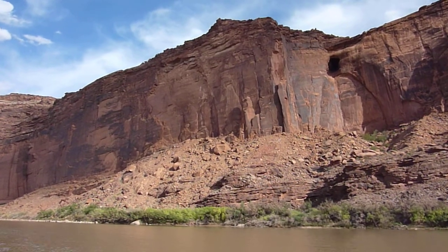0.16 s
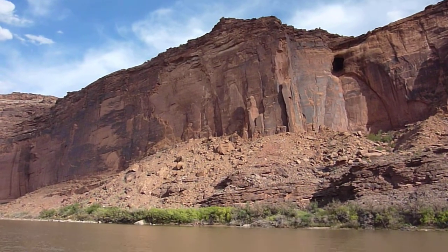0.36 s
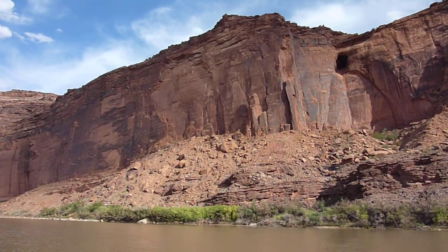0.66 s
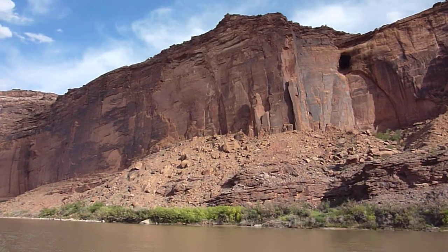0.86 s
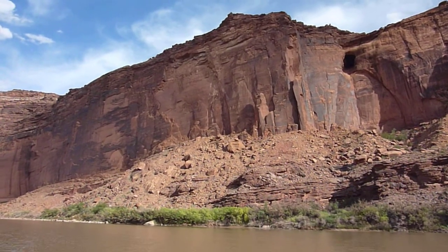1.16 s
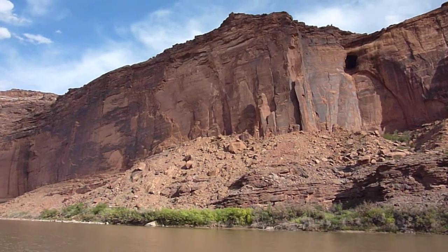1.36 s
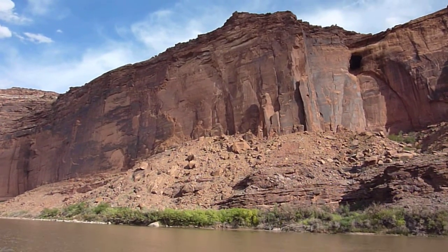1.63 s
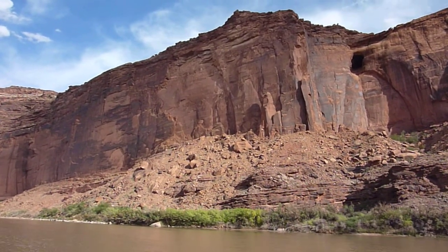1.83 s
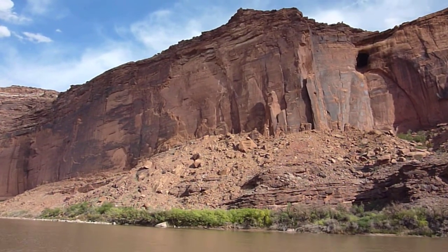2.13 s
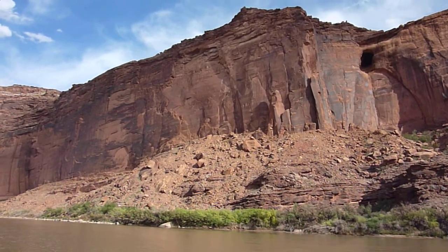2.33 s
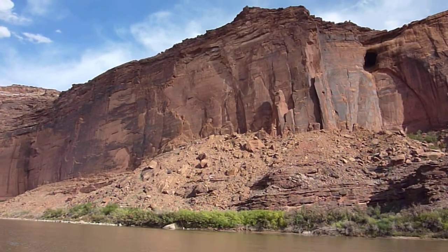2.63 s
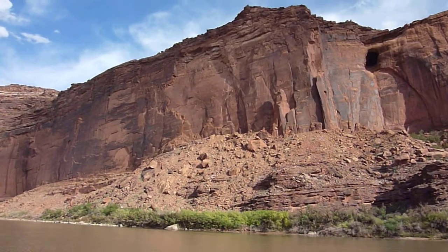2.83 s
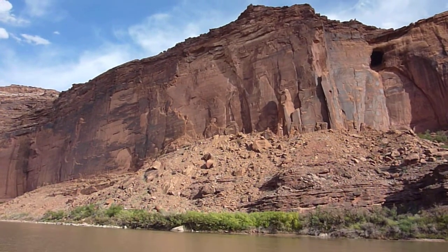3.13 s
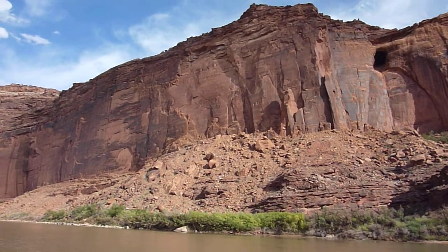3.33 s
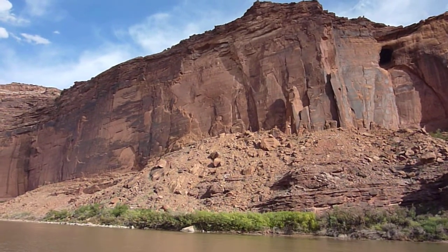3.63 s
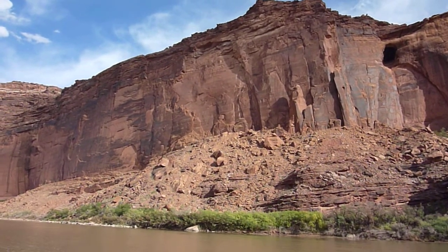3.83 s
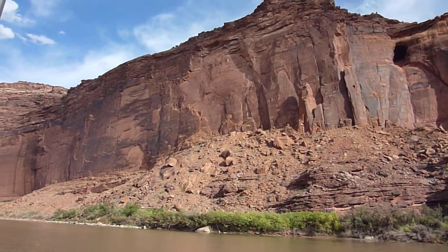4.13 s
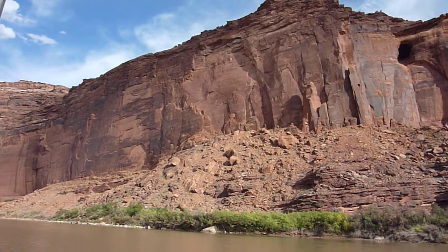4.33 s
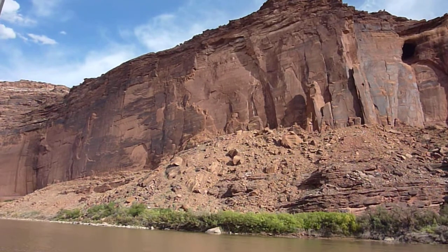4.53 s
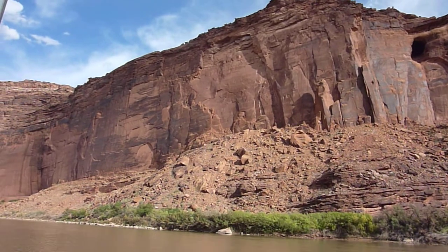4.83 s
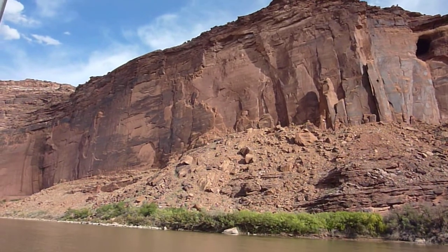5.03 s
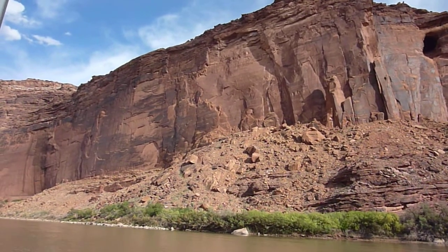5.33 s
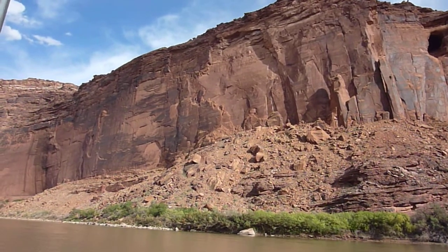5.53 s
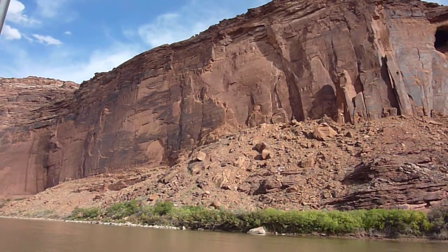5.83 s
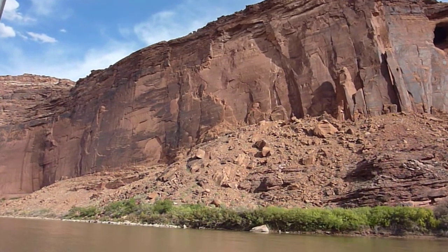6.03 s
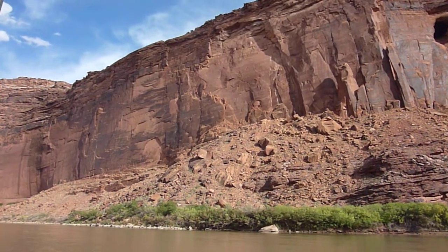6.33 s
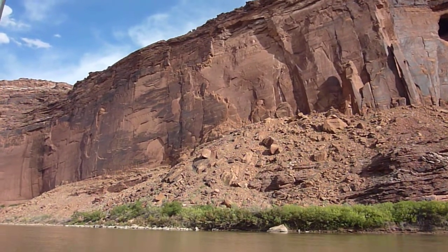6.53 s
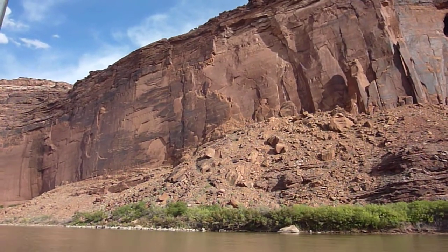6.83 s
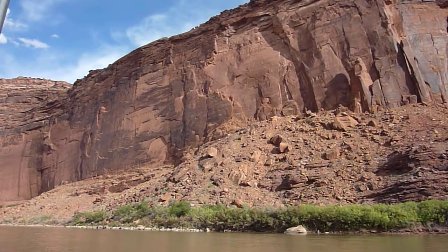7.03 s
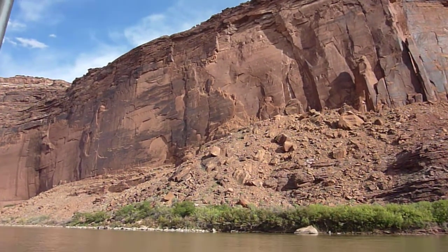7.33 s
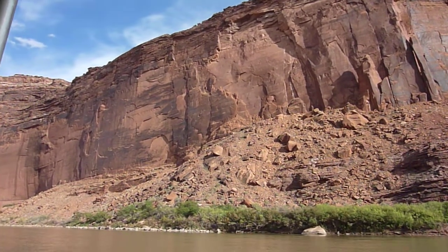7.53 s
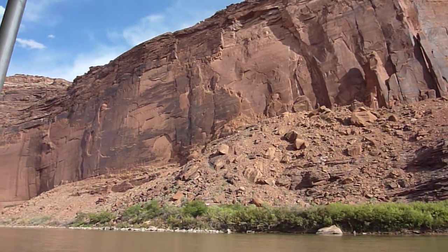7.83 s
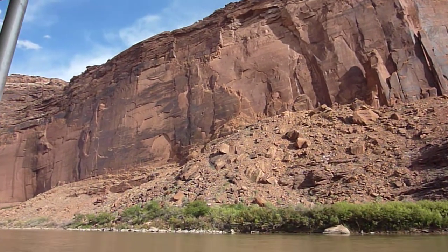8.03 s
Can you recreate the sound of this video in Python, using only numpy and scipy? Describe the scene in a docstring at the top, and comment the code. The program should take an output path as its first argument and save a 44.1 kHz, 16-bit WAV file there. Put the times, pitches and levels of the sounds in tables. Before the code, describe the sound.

A motorboat runs at constant speed on a river while gusty head wind rumbles, thumps and crackles loudly across the microphone.

```python
"""Jet boat in a head wind

A jet boat runs at steady speed up a canyon river, heard at the two microphone ports of a camera on deck.
The hum and thin whine of the engine are gliding sines; jet, wake and spray are coloured noise and ticks.
Over them the head wind, noise swollen by gusts, buffets and rasps at the ports, mostly the left one.
Hard eddies add thumps, and the strongest pressures overload softly."""
import sys
import numpy as np
from scipy import signal
from scipy.fft import rfft, irfft
from scipy.io import wavfile
from scipy.ndimage import uniform_filter1d

SR = 44100
rng = np.random.default_rng(int(sys.argv[2]) if len(sys.argv) > 2 else 0)


def waveform_to_disk(signal):
    """Save audio, clipped to [-1, 1], as 16-bit WAV at the path in sys.argv[1]."""
    frames = np.transpose(np.atleast_2d(signal))
    scaled = np.clip(frames, -1, 1) * 32767
    samples = np.round(scaled).astype(np.int16)
    wavfile.write(sys.argv[1], SR, samples)


N = 361179
TIME = np.arange(N) / SR
HZ = np.fft.rfftfreq(N, 1 / SR)

# Thin whine of the drive: (time [s], frequency [Hz], level [dB])
WHINE_GLIDE = [(0, 5720, -64), (.55, 5860, -60), (.95, 5740, -65), (1.3, 5792, -65), (1.7, 5760, -59),
               (1.95, 5760, -66), (2.25, 5787, -61), (2.6, 5840, -61), (2.95, 5791, -66), (3.2, 5750, -60),
               (3.7, 5820, -65.5), (4.9, 5900, -66), (5.2, 5730, -59), (5.55, 5789, -63), (5.85, 5820, -56),
               (6.2, 5750, -63), (6.5, 5880, -57), (6.95, 5787, -62), (7.3, 5830, -65), (8.19, 5788, -65)]
# Spectrum of jet, hull and wake: (frequency [Hz], relative density [dB per Hz])
WAKE_SPECTRUM = [(20, -22.5), (60, 0.5), (150, 4.5), (300, -1.5), (600, -3.5), (1500, -20), (4000, -31),
                 (7000, -35), (9000, -60.5)]
# Spectrum of fine spray drops: (frequency [Hz], relative density [dB per Hz])
SPRAY_SPECTRUM = [(800, -26.5), (2500, 8.5), (5000, 7), (7400, 3.5), (8500, -27.5)]
# Short broadband ticks, the one at 4.33 s the clearest: (time [s], level [dB])
SHORT_TICKS = [(.28, -32), (1.261, -32), (1.749, -33), (4.33, -20), (4.681, -32), (5.856, -32),
               (7.567, -37), (8.121, -22)]
# Single hard eddies that thump on the ports: (time [s], level [dB])
HARD_EDDIES = [(.784, -6), (1.786, -7), (2.259, -7), (2.847, -6), (4.955, -5), (5.856, -5), (6.06, -1),
               (6.559, -5), (6.903, -6), (7.567, -6), (8.12, -4)]
# Spectrum of large eddies: (frequency [Hz], relative density [dB per Hz])
BUFFET_SPECTRUM = [(15, -33), (30, -12.5), (50, -7), (100, -4), (180, -.6), (280, 0.23), (400, -1.5),
                   (600, -7), (1000, -14.5), (2000, -31.5), (8000, -71.5)]
# Left port's share of the large eddies: (frequency [Hz], left minus right [dB])
BUFFET_TILT = [(30, 7.4), (70, 4.5), (200, 8.9), (400, 6.2), (700, 5.2), (1200, 1.4)]
# Phase of the large eddies between the ports: (frequency [Hz], lead of the left port [rad])
BUFFET_PHASE = [(25, 0.2), (65, -1.3), (140, -0.3), (220, 1.4), (350, 1.2), (600, 1.93), (1500, 2)]
# Spectrum of small eddies: (frequency [Hz], relative density [dB per Hz])
RASP_SPECTRUM = [(20, -47.5), (80, -13.5), (200, -6), (400, 0.5), (650, 2.14), (1000, -2), (1500, -6),
                 (2000, -10.5), (3000, -14), (4000, -15.8), (5000, -20), (6000, -24), (7200, -28.5),
                 (8200, -51)]
# Departure of the small eddies from exact opposition at the ports: (frequency [Hz], lead of the left [rad])
RASP_PHASE = [(200, 0.21), (450, -0.7), (700, -0.38), (1100, -0.25), (2000, -0.06), (4000, -0.17),
              (7000, -.27)]
# Slow swell of the head wind by eddy size: (time [s], large [dB], middle [dB], small [dB])
WIND_SWELL = [(0, 2, -6.5, -0.5), (0.45, -1.9, 0.5, 0.5), (0.9, 2, -1.5, 1.5), (1.3, -1.1, -3, -2),
              (1.7, 1.4, -3, 1.5), (2.1, 0.5, -1, -1.0), (2.7, 0.4, 1.0, 1.0), (3.2, 2, -1.5, -0.3),
              (3.55, -1.5, 1.1, 0), (4.15, 0.2, -2.5, -1.8), (4.6, -0.4, -3, -2), (5.05, -1.2, -4, -2.5),
              (5.6, 0.5, -2, -0.6), (6.1, -1.1, -1.2, -3.5), (6.5, 0.9, 1.3, 1), (7.35, 0.4, 0.8, -0.2),
              (7.9, -1.4, -1, -1.9), (8.19, -0.3, 1, -2.6)]
# Gusts, or lulls where negative: (middle time [s], length [s], large [dB], middle [dB], small eddies [dB])
WIND_GUSTS = [(0.132, 0.069, -2.5, 7.5, 4), (0.292, 0.12, 0.5, 3, 3), (0.412, 0.046, 1, 4, 1),
              (0.586, 0.069, -1, -3.5, -2.5), (0.671, 0.1, 1, -2, -2.5), (1.045, 0.095, 0, -4, -5),
              (1.185, 0.054, 4.5, 3.5, 2.5), (1.379, 0.13, 2.5, 3.5, 3.5), (1.474, 0.08, 1, 8, 3.5),
              (1.519, 0.05, -10, -1.5, -5), (1.803, 0.1, -3, -4.5, -4.5), (1.888, 0.057, -0.5, -3, -6),
              (1.988, 0.069, 2.5, 8.5, 4.5), (2.153, 0.046, 0.5, -1.5, 3.0), (2.217, 0.08, 0, -2.5, 3.0),
              (2.447, 0.12, -3.5, -7, -2), (2.547, 0.058, 1.5, 1.5, 3.5), (2.632, 0.04, 3.5, -0.5, 2),
              (2.731, 0.1, 2, 1, 2), (3.155, 0.067, 0.5, 0, 6), (3.35, 0.05, -2.5, 7, 3.5),
              (3.52, 0.049, -5, -6.5, -8.5), (3.699, 0.088, 1.5, 6, 2.0), (3.929, 0.06, 3.5, 0.5, 4),
              (4.018, 0.045, 2.5, 3.5, 3), (4.063, 0.03, 4, 6, 1.5), (4.178, 0.086, 4.5, 6.5, 4.5),
              (4.308, 0.05, 0.0, 8, 0), (4.373, 0.13, 2, 2, 3), (4.422, 0.13, -2.5, 1.5, 1.5),
              (4.477, 0.052, 1.5, 0, 6), (4.667, 0.11, 4, 2, 4), (4.737, 0.057, 1.0, 4.0, 4),
              (4.807, 0.074, 1, 4.5, 4.5), (4.936, 0.11, 0, 6.5, 2.5), (4.961, 0.05, 3, -9, 0.5),
              (5.096, 0.05, 2, 7, 0.5), (5.181, 0.1, 3.5, 1.5, 6.5), (5.29, 0.1, 2, 0, -1.5),
              (5.39, 0.08, -2.5, -1, -2.5), (5.435, 0.04, 0, 3, 4), (5.545, 0.11, 1.5, 1, 2.5),
              (5.66, 0.054, 4.5, 5, 2), (5.695, 0.1, -2.0, 2.5, 5.0), (5.819, 0.077, 0, -3, 2),
              (5.859, 0.12, -1.5, 3, 3.5), (5.969, 0.1, -2, 0.5, 3), (6.004, 0.05, 3, 4, 4.5),
              (6.054, 0.037, 4.5, 2.5, 1.5), (6.203, 0.045, -0.5, 0.5, 4.0), (6.273, 0.15, 4, 0.5, 3),
              (6.333, 0.052, -3, 1.5, 0), (6.528, 0.054, 1, -7.5, -4), (6.642, 0.04, -4, -6, -3.5),
              (6.782, 0.042, -4.5, -3, -3.5), (6.867, 0.04, -5, -2.5, -4), (6.997, 0.06, -1.5, -0.5, 1),
              (7.086, 0.05, -1, -5, -3.5), (7.246, 0.1, 1, 8, 3), (7.381, 0.06, 2.5, 10, 3.5),
              (7.431, 0.079, 0.5, 4.0, 2.0), (7.565, 0.029, -1.5, -6, 2.5), (7.635, 0.059, 1, -3.5, -5),
              (7.73, 0.11, -2, 6.5, 4.5), (7.915, 0.049, -3.5, 3.5, 4.5), (7.989, 0.05, 1, 0, 5.5),
              (8.049, 0.031, 4, 1.5, 2), (8.089, 0.06, -2, 5, 5.5), (8.119, 0.031, 5, 3.5, 5.5)]
# Brief rises of the large and middle wind noise: (time [s], rise [dB])
BRIEF_RISES = [(1.029, 5.5), (1.075, 4.5), (1.237, 1), (1.578, 6), (2.088, 2.5), (2.845, 2.5), (2.978, 4),
               (3.824, 8.5), (3.91, 3.5), (4.49, 3), (4.828, 3.5), (4.954, 1.5), (5.301, 5.5), (5.345, 5),
               (5.535, 2), (5.855, 4), (6.006, 3.5), (6.456, 2), (6.669, 3.5), (6.821, 3), (7.175, 6.5),
               (7.567, 4), (7.771, 4.5)]
# Sharp crackles of small eddies: (time [s], change [dB])
SHARP_CRACKLES = [(1.983, 2), (2.156, 5), (2.539, 1), (2.629, 3.5), (2.749, 4), (2.856, 1), (3.346, 1.5),
                  (4.413, 4), (5.177, 3), (6.26, 2), (7.001, 4.5), (7.246, -0.5), (7.748, 4), (7.99, 1.5)]
# Stop bands of the camera: (frequency [Hz], width [Hz])
STOP_BANDS = [(5435, 340), (7910, 19), (8120, 330)]


def gain_of(db):
    """Logarithmic level: 20 dB is a factor of ten in amplitude."""
    return 10 ** (np.asarray(db) / 20)


def evened(x):
    """Normalization: scales to an rms of 1."""
    return x / np.sqrt(np.mean(x ** 2) + 1e-20)


def read(points):
    """Interpolation in pitch: joins (frequency, value) points on a log-frequency axis."""
    hz, value = np.transpose(points)
    return np.interp(np.log(HZ + 1), np.log(hz + 1), value)


def follow(curve):
    """Interpolation in time: joins the rows of a curve, giving one array for each column."""
    s, *columns = np.transpose(curve)
    return [np.interp(TIME, s, column) for column in columns]


def arches(events):
    """Superposition: each row (time, length, dB, ..) adds a raised-cosine arch to each level curve."""
    out = np.zeros((len(events[0]) - 2, N))
    for s, length_s, *dbs in events:
        span = abs(TIME - s) < length_s / 2
        arch = np.cos(np.pi * (TIME[span] - s) / length_s) ** 2
        out[:, span] += np.outer(dbs, arch)
    return out


def wander(slow_hz, fast_hz):
    """Band-limited random motion: noise between two rates, its extremes rounded off, of rms 1."""
    band = HZ ** 2 / (HZ ** 2 + slow_hz ** 2) / (1 + (HZ / fast_hz) ** 2)
    motion = evened(irfft(rfft(rng.standard_normal(N)) * band, N))
    return evened(np.tanh(motion / 2))


def eddies(strength_db):
    """Amplitude modulation: spectra of two unrelated noises that swell and fade together."""
    strength = evened(gain_of(strength_db))
    return rfft(rng.standard_normal((2, N)) * strength)


def port_pair(drive, spectrum, likeness, lead=0., balance_db=0.):
    """Partial coherence: colours two noises and mixes them to a set correlation between the ports."""
    left, other = drive
    mixed = likeness * left + np.sqrt(1 - likeness ** 2) * other
    right = mixed * np.exp(-1j * lead)
    tilt = gain_of(balance_db / 2)
    ports = np.array([left * tilt, right / tilt])
    return evened(irfft(ports * gain_of(read(spectrum)), N))


def tone(hz, db, balance_db, lead):
    """Frequency modulation: a sine whose phase sums its gliding frequency, later at the right port."""
    phase = 2 * np.pi * np.cumsum(hz) / SR
    tilt = gain_of(balance_db / 2)
    ports = np.array([tilt * np.sin(phase), np.sin(phase - lead) / tilt])
    return np.sqrt(2) * gain_of(db) * ports


def engine(hum_hz=290.6, hum_db=-40.5, throb_db=2, waver_hz=1.2, flicker_db=2.2):
    """Periodic sources: the firing hum throbs slowly at a steady speed; a thin whine drifts high above it."""
    hum_pitch = hum_hz + 0.36 * wander(0.66, 0.99)
    hum = tone(hum_pitch, hum_db + throb_db * wander(0.36, 3.9), balance_db=-2.5, lead=1.0)
    whine_hz, whine_db = follow(WHINE_GLIDE)
    whine_pitch = whine_hz + waver_hz * wander(1.2, 9.7)
    whine = tone(whine_pitch, whine_db + flicker_db * wander(1.5, 9.4), balance_db=-4.0, lead=1.2)
    return hum + whine


def wake(level_db=-28.0, churn_db=4.0):
    """Turbulent flow noise: jet and hull water churn and rush, partly alike at the two ports."""
    churn = eddies(churn_db * wander(6, 32))
    return gain_of(level_db) * port_pair(churn, WAKE_SPECTRUM, likeness=0.56)


def spray(level_db=-54.0, drops_per_s=380, spread_db=3.0):
    """Random impacts: fine drops thrown up by the hull tick faintly, a few louder than the rest."""
    size = gain_of(spread_db * np.minimum(rng.exponential(1, (2, N)), 5))
    falls = rng.random((2, N)) < drops_per_s / SR
    drops = rng.choice([-1, 1], (2, N)) * size * falls
    return gain_of(level_db) * port_pair(rfft(drops), SPRAY_SPECTRUM, likeness=0.97)


def short_ticks(fade_s=0.00051, dull_hz=7000):
    """Exponential decay: each tick is a short burst of broadband noise, the same at both ports."""
    strength = np.zeros(N)
    for s, db in SHORT_TICKS:
        strength += gain_of(db) * (TIME >= s) * np.exp(-abs(TIME - s) / fade_s)
    ticks = strength * rng.standard_normal(N)
    return signal.lfilter(*signal.butter(4, dull_hz, fs=SR), ticks)


def thumps(time_scale_s=0.00058, right_share=0.17):
    """Pressure pulse: a hard eddy pushes the left port, then sucks; the right one feels it weakly."""
    out = np.zeros(N)
    for s, db in HARD_EDDIES:
        u = np.maximum(TIME - s, 0) / time_scale_s
        out += gain_of(db) * np.e * u * (1 - u / 2) * np.exp(-u)
    return np.array([out, right_share * out])


def buffeting(gust_db, flutter, level_db=-20.5, flutter_db=.9, lumps_db=1.5):
    """Turbulent pressure: large eddies press on the ports in uneven lumps."""
    drive = eddies(flutter_db * flutter + lumps_db * wander(40, 300))
    air = port_pair(drive, BUFFET_SPECTRUM, likeness=0.45,
                    lead=read(BUFFET_PHASE), balance_db=read(BUFFET_TILT))
    return gain_of(gust_db + level_db) * air


def rasping(gust_db, roar_db, flutter, level_db=-23.3, flutter_db=1.13,
            crackle_db=2.0, patchy_db=2.0, fizz_swing=1.9):
    """Vortex shedding: small eddies tear off the camera in bursts and push the ports in near opposition."""
    bursts_db = flutter_db * flutter + crackle_db * wander(38, 600)
    octave = np.log2(np.clip(HZ, 400, 6400) / 400)
    drive = 0
    for k in range(5):  # each eddy size fills its own overlapping octave, with its own patchiness
        share = np.sqrt(np.maximum(1 - abs(octave - k), 0))
        coarse = np.interp(k, [0, 1, 2, 3], [1, .9, .1, 0])  # the lower octaves move with the roar
        swing = fizz_swing if k == 4 else 1  # the finest fizz swings most with the wind
        speed_db = coarse * roar_db + (1 - coarse) * gust_db + bursts_db
        drive = drive + share * eddies(swing * speed_db + patchy_db * wander(9.9, 120))
    air = port_pair(drive, RASP_SPECTRUM, likeness=-0.81, lead=read(RASP_PHASE))
    return gain_of(gust_db.mean() + level_db) * air


def wind(large_jitter_db=0.85, middle_jitter_db=0.8, small_jitter_db=0.5, crackle_s=0.0069, rise_s=0.019):
    """Level modulation: swell, gusts and jitter set each eddy size apart; the fast flutter is shared."""
    large_swell, middle_swell, small_swell = follow(WIND_SWELL)
    large_gusts, middle_gusts, small_gusts = arches(WIND_GUSTS)
    # brief rises lift large and middle eddies; crackles touch only the small
    rises, = arches([(s, rise_s, db) for s, db in BRIEF_RISES])
    crackles, = arches([(s, crackle_s, db) for s, db in SHARP_CRACKLES])
    large_db = large_swell + large_gusts + rises + large_jitter_db * wander(11, 27)
    middle_db = middle_swell + middle_gusts + rises + middle_jitter_db * wander(7.4, 18)
    small_db = small_swell + small_gusts + crackles + small_jitter_db * wander(8, 20)
    flutter = wander(11, 32)
    return buffeting(large_db, flutter) + rasping(small_db, middle_db, flutter)


def overload(x, knee=.6, headroom=.3, lopsided=.16):
    """Nonlinear response: the microphone yields more to push than to pull and rounds off past the knee."""
    x = x + lopsided * (x ** 2 - uniform_filter1d(x ** 2, size=1001))
    excess = np.maximum(abs(x) - knee, 0)
    return x - np.sign(x) * (excess - headroom * np.tanh(excess / headroom))


def scene():
    """Superposition: engine, water, ticks and wind pressures add at the ports."""
    return engine() + wake() + spray() + short_ticks() + thumps() + wind()


def record(dry, edge_hz=8500):
    """Band limitation: after soft overload the camera cuts treble stop bands, then all above its edge."""
    wet = overload(dry)
    for hz, width_hz in STOP_BANDS:
        wet = signal.lfilter(*signal.iirnotch(hz, hz / width_hz, fs=SR), wet)
    low_pass = signal.firwin(255, edge_hz, window=("kaiser", 9), fs=SR)
    return signal.oaconvolve(wet, low_pass[None], "same")


dry = scene()
out = record(dry)
waveform_to_disk(out)
```